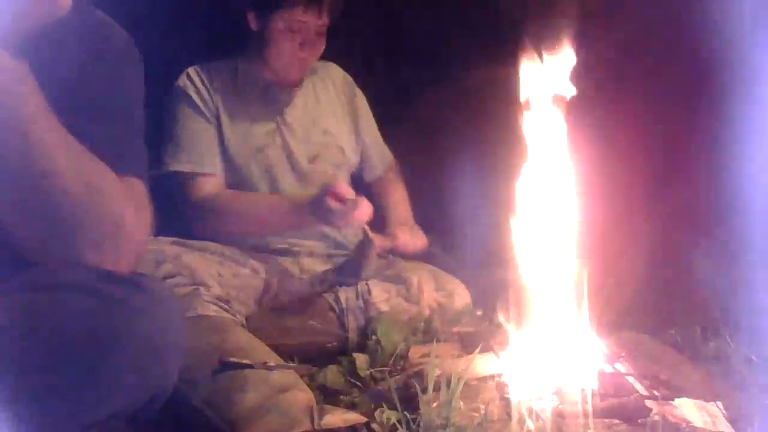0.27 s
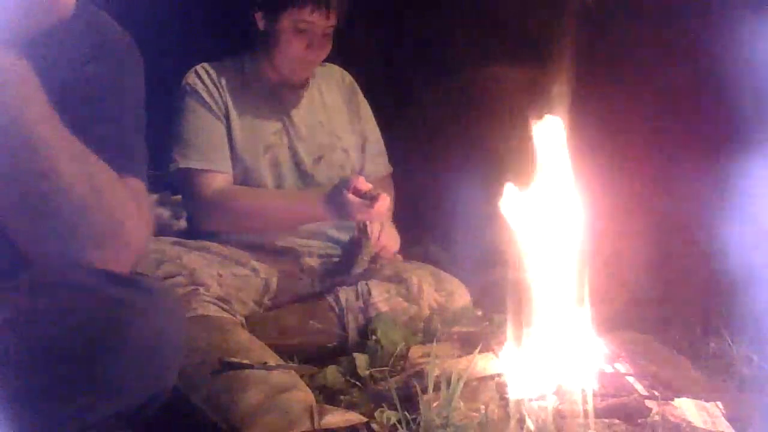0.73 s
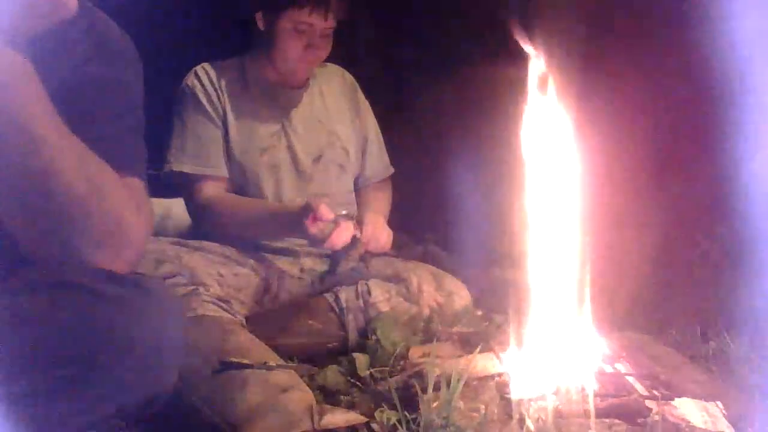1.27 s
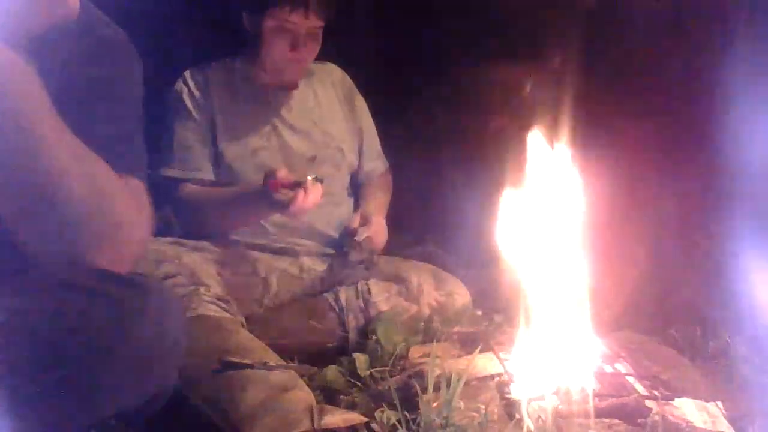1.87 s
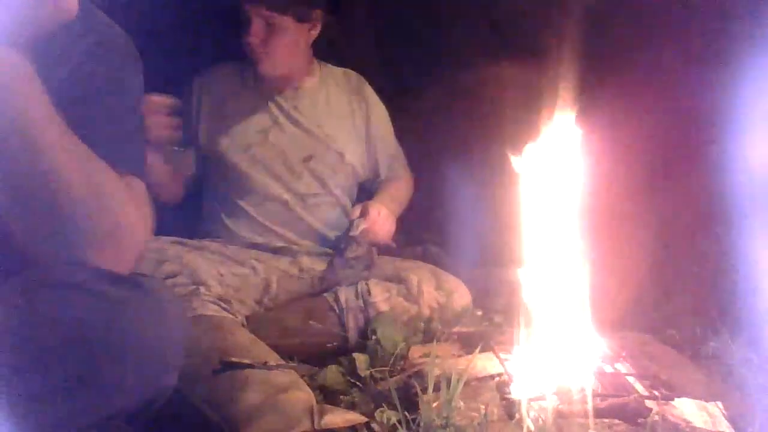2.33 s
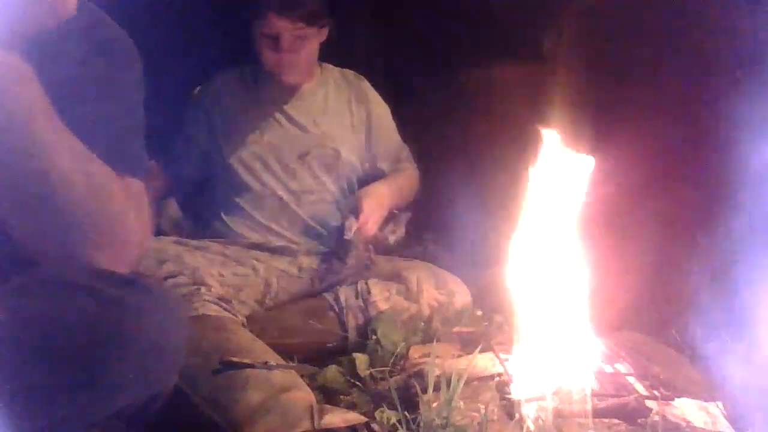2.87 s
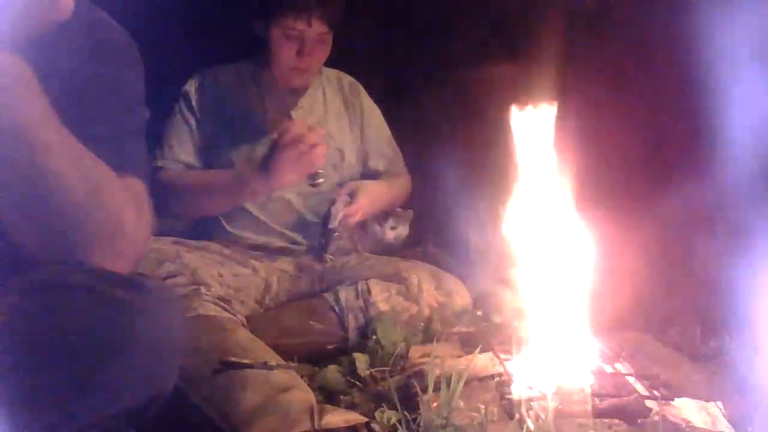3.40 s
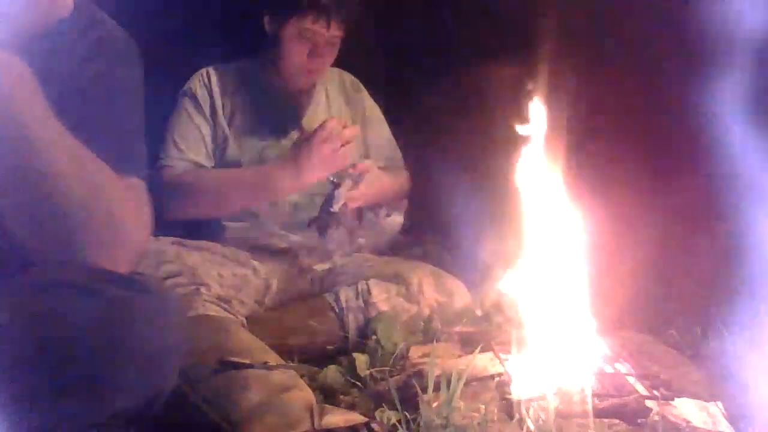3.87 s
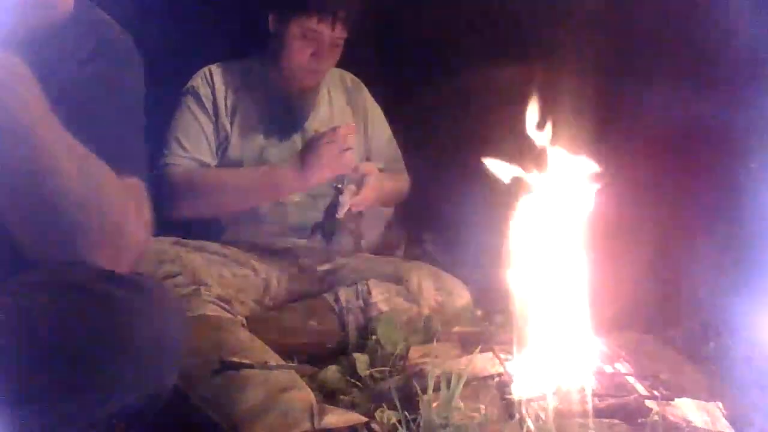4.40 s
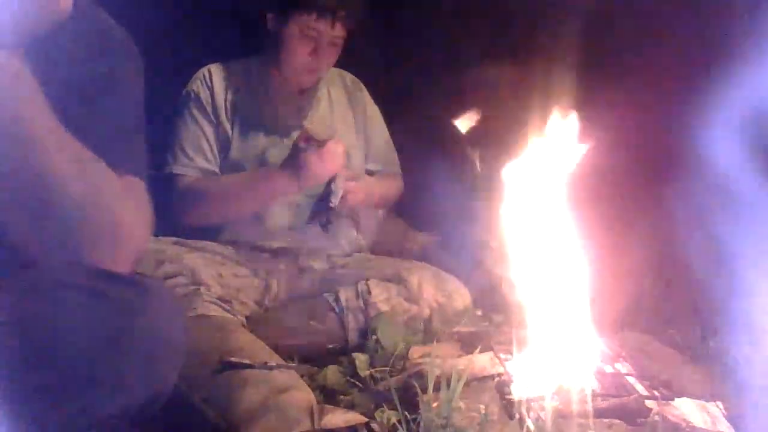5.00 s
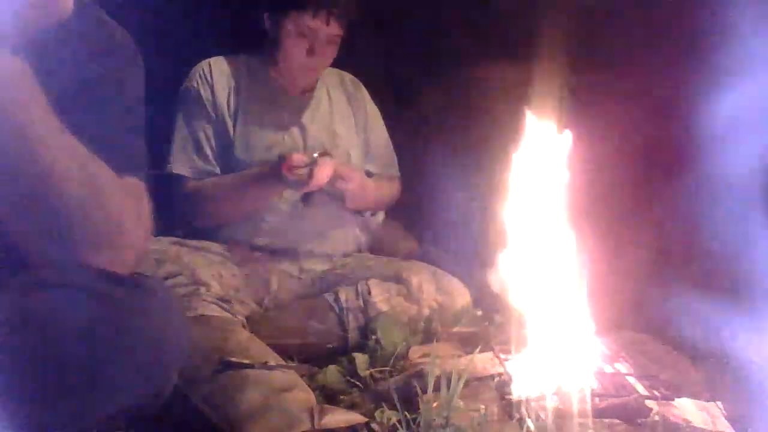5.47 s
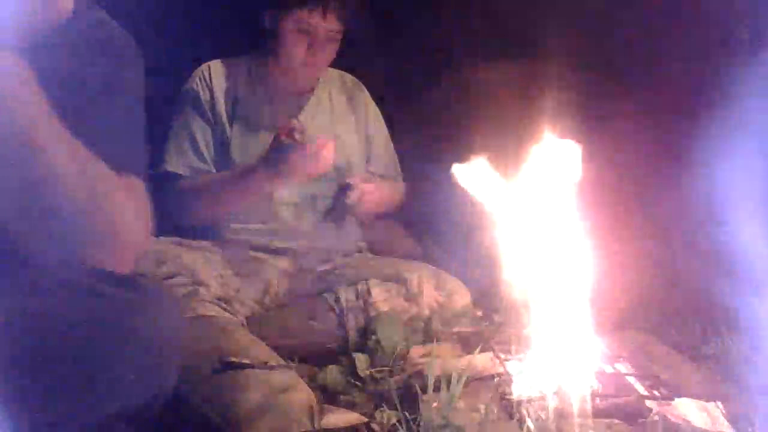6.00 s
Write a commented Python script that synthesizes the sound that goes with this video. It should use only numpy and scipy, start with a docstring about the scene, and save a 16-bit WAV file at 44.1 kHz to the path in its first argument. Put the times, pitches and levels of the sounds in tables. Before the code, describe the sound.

Someone whittles near the microphone beside a campfire in the woods, making two short bursts of crisp snaps, scrapes and dull knocks. Between the bursts an owl hoots twice, clear and echoing, and it calls once more at the end. Each hoot slides up, holds and sags. The fire pops loudly at the start, then keeps up a low rumble and faint ticking under steady distant crickets and a soft hiss.

```python
"""An owl hoots three times near a campfire at night, and the woods ring on after each call.
Each hoot is a nearly pure tone that slides up hoarsely, holds and sags away.
Someone whittles a stick by the fire: the knife snaps off chips and scrapes along the wood.
The flames rumble, tick and pop once, over steady crickets and the microphone's hiss."""
import sys
import numpy as np
from scipy import signal
from scipy.fft import rfft, irfft
from scipy.io import wavfile

SR = 44100
rng = np.random.default_rng(int(sys.argv[2]) if len(sys.argv) > 2 else 0)


def dump_mix(stems):
    """Bounce the given channels to the path in sys.argv[1] as a 16-bit WAV at rate SR."""
    frames = np.atleast_2d(stems).T  # one column per channel
    limited = np.clip(frames, -1, 1)  # hard clip at full scale
    pcm = np.round(limited * 32767).astype(np.int16)
    wavfile.write(sys.argv[1], SR, pcm)


N = 275139
TIME = np.arange(N) / SR
FREQS_HZ = np.fft.rfftfreq(N, 1 / SR)
HIT_MS = np.arange(SR // 8) * 1000 / SR  # the clock for one short hit


def amp(db):
    """Turns decibels into a gain."""
    return 10 ** (np.asarray(db) / 20)

def unit(x):
    """Scales a signal to an average (rms) size of 1."""
    return x / np.sqrt(np.mean(x ** 2) + 1e-20)

def read(points, hz):
    """Reads between a table's rows, with frequency spaced in octaves."""
    freqs, values = np.transpose(points)
    return np.interp(np.log(hz + 1), np.log(freqs + 1), values)

def add(mix, start_s, sound):
    """Mixes a sound in at its start time."""
    part = mix[round(start_s * SR):][:len(sound)]
    part += sound[:len(part)]

def noise(colour, tilt_db=0, pivot_hz=1500):
    """Noise shaped by a colour table, gaining tilt_db for each octave above the pivot."""
    octaves = np.log2(np.maximum(FREQS_HZ / pivot_hz, 1))
    gains = amp(read(colour, FREQS_HZ) + tilt_db * octaves)
    return unit(irfft(rfft(rng.standard_normal(N)) * gains, N))

def wander(rate_hz):
    """A random drift, mostly slower than rate_hz."""
    return unit(irfft(rfft(rng.standard_normal(N)) / (1 + (FREQS_HZ / rate_hz) ** 4), N))

def ease(x):
    """A smooth step from 0 to 1."""
    return np.sin(np.pi / 2 * np.clip(x, 0, 1)) ** 2


# Flame rumble and microphone hiss: freq_hz, level_db
AIR_COLOUR = [(10, -8), (30, 3), (60, -0.5), (120, -6.5), (220, -13.5), (450, -18), (900, -24),
              (2000, -25.5), (3300, -28), (7000, -34.5), (11000, -23.5), (15500, -25)]

def flames_and_hiss(level_db=-41, flicker_db=3.5):
    """The low rumble of the flames flickers while the hiss stays even."""
    air = amp(level_db) * noise(AIR_COLOUR)
    rumble = signal.sosfilt(signal.butter(1, 250, fs=SR, output="sos"), air)
    return air + rumble * (amp(flicker_db * wander(21)) - 1)

# The high, narrow band the crickets sing in: freq_hz, level_db
CRICKET_COLOUR = [(3300, -29), (3850, -8.5), (4150, 0.5), (4400, 0.5), (4750, -11), (5400, -40.5)]

def crickets(level_db=-51, throb_db=1.04):
    """Far crickets blend into one gently throbbing chorus."""
    return amp(level_db + throb_db * wander(25)) * noise(CRICKET_COLOUR)

# How the woods ring: freq_hz, ring_s (time to fade by 60 dB), level_db
WOODS_RING = [(199, 1.4, -10), (424, 1.76, 2), (580, 2.8, 11.5), (820, 0.94, 24), (1090, 2.65, 26.5),
              (2120, 0.6, 5), (4000, .6, -12), (10000, 0.26, -1)]

def woods_echo(sound, near_db=-19, near_s=0.11, far_db=-23):
    """Near trunks scatter a quick echo; the woods beyond ring on, most in the middle range."""
    t = TIME[:int(1.5 * SR)]
    wash = rng.standard_normal(len(t)) * np.minimum(t / 0.04, 1)
    hz, frame_s, bands = signal.stft(wash, SR, nperseg=256)
    ring_s, colour_db = (read(np.array(WOODS_RING)[:, [0, k]], hz)[:, None] for k in (1, 2))
    far = signal.istft(bands * amp(colour_db - 60 * frame_s / ring_s), SR, nperseg=256)[1][:len(t)]
    bounces = rng.standard_normal(len(t)) * (rng.random(len(t)) < .01)
    near = bounces * (t > .012) * np.exp(-t / near_s)
    echo = amp(near_db) * near / np.linalg.norm(near) + amp(far_db) * far / np.linalg.norm(far)
    return signal.fftconvolve(sound, echo)[:N]

# Cracking wood: freq_hz, level_db
CRACK_COLOUR = [(100, -11.5), (500, -17.5), (1500, -4.5), (3000, -12.5), (4200, -3), (6000, 0.5),
                (7600, 3.5), (10000, 0.5), (13000, -2), (16000, -3), (17500, -40)]

def crack_noise(tilt_db=0):
    """The bright noise shared by the fire's crackle and the snapping chips."""
    return noise(CRACK_COLOUR, tilt_db)

def embers(ticks_per_s=12, level_db=-46, decay_s=.0012):
    """Burning wood gives tiny ticks at random moments."""
    ticks = (rng.random(N) < ticks_per_s / SR) * amp(12 * rng.random(N) ** 2)
    envelope = signal.lfilter([1], [1, -np.exp(-1 / (decay_s * SR))], ticks)
    return amp(level_db) * envelope * crack_noise()

# The pop in the fire: freq_hz, level_db
RESIN_COLOUR = [(60, 1), (400, 11), (2000, 10), (4000, 6), (5200, -6), (8000, 4.5), (11000, 8.5),
                (15500, 17), (17000, -17)]

def resin_pop(start_s=.1073, level_db=2.5, fizz_db=-20, fizz_s=0.0034):
    """A pocket of resin bursts: one steep pressure pulse, then a fizz of escaping gas."""
    log_gain = np.log(amp(read(RESIN_COLOUR, abs(np.fft.fftfreq(2048, 1 / SR)))))
    # pack the energy at the very start of the pulse
    pulse = np.fft.ifft(np.exp(np.conj(signal.hilbert(log_gain)))).real
    fizz = crack_noise(tilt_db=6.6)[:len(pulse)] * np.exp(-TIME[:len(pulse)] / fizz_s)
    out = np.zeros(N)
    add(out, start_s, amp(level_db) * (pulse + amp(fizz_db) * fizz))
    return out

# Light taps on the knife: start_s, level_db, decay_ms
KNIFE_TAPS = [(3.463, -37, 30), (3.932, -35, 4), (5.1336, -25.5, 2.3), (5.147, -39, 2.6)]
# The notes the knife rings at: pitch_hz, width_hz, level_db
KNIFE_NOTES = [(2500, 240, -15), (3300, 22, -6), (3520, 710, 2), (5090, 210, 0.5), (6700, 490, -9),
               (7860, 790, -10)]

def knife_rattle(lowest_hz=2800):
    """A tap sets the knife chattering; it is too small to give off low notes."""
    body = sum(amp(db) / (1 + 2j * (FREQS_HZ - hz) / width_hz) for hz, width_hz, db in KNIFE_NOTES)
    body *= np.minimum(FREQS_HZ / lowest_hz, 1) ** 4
    envelope = np.zeros(N)
    for start_s, level_db, decay_ms in KNIFE_TAPS:
        add(envelope, start_s, amp(level_db) * np.exp(-TIME * 1000 / decay_ms))
    return envelope * unit(irfft(rfft(rng.standard_normal(N)) * body, N))

# Knocks of wood and bumps on the ground: start_s, level_db, pitch_hz, decay_ms
DULL_KNOCKS = [(1.03, -19.5, 70, 9.1), (1.456, -24, 500, 16.4), (1.505, -12.5, 518, 4.2),
               (1.534, -25, 446, 5.1), (1.592, -25.5, 350, 3.8), (5.181, -27, 655, 3),
               (5.471, -22, 718, 4.2), (5.472, -22.5, 234, 4.4), (5.736, -25.5, 884, 1.85)]

def knocks(upper_db=-13, attack_ms=0.9):
    """Each knock rings with two notes that die away quickly."""
    out = np.zeros(N)
    for start_s, level_db, pitch_hz, decay_ms in DULL_KNOCKS:
        phase = 2 * np.pi * pitch_hz * HIT_MS / 1000
        ring = np.sin(phase) + amp(upper_db) * np.sin(1.7 * phase)
        envelope = (1 - np.exp(-HIT_MS / attack_ms)) * np.exp(-HIT_MS / decay_ms)
        add(out, start_s, amp(level_db) * ring * envelope)
    return out

# Blade and hands rubbing the stick: start_s, length_s, level_db, tilt_db_per_octave
SCRAPES = [(0.48, 0.055, -48.5, -11.5), (1.112, 0.022, -46.5, -9.5), (1.481, 0.063, -20, 2),
           (1.52, 0.081, -37, -2.5), (3.465, 0.137, -51, -3.5), (4.989, 0.022, -44, -6),
           (5.43, 0.1, -37.5, -1.5), (5.502, 0.1, -35.5, -2)]
# The blade on wood: freq_hz, level_db
BLADE_COLOUR = [(30, -40), (200, -7), (900, -11.5), (3000, -5.5), (5500, 0), (10000, -2.5), (16000, 1)]

def scrapes(grain_hz=300, grain_db=3, slip_db=1.0):
    """The blade catches and slips on the grain."""
    out = np.zeros(N)
    catches = unit(amp(grain_db * wander(grain_hz) + slip_db * wander(grain_hz / 10)))
    for start_s, length_s, level_db, tilt_db in SCRAPES:
        pressure = np.interp((TIME - start_s) / length_s, [0, .1, .8, 1], [0.035, 0.78, 0.9, 0.038])
        out += amp(level_db) * pressure * catches * noise(BLADE_COLOUR, tilt_db)
    return out

# Chips snapping off: start_s, level_db, decay_ms, tilt_db_per_octave
CHIP_SNAPS = [(1.4559, -4, 1.73, -0.5), (1.4729, -10, 5.6, 0), (1.507, -14.5, 2.4, -1.5),
              (5.296, -19, 0.83, 3.5), (5.376, -29, 2.4, 8), (5.4536, -11, 1.05, 0.7)]

def snaps(tail_db=-19, tail_stretch=9):
    """Wood fibres break in a short burst; the stick buzzes on briefly."""
    out = np.zeros(N)
    for start_s, level_db, decay_ms, tilt_db in CHIP_SNAPS:
        tail_ms = tail_stretch * np.sqrt(decay_ms)
        burst = np.exp(-HIT_MS / decay_ms) + amp(tail_db) * np.exp(-HIT_MS / tail_ms)
        add(out, start_s, amp(level_db) * burst * crack_noise(tilt_db)[:len(HIT_MS)])
    return out


def breath(start_s, length_s, level_db, top_hz, hoarse_s):
    """A hoot climbs as air pressure builds, pushes, eases to a lower, purer note and closes."""
    low_hz, climb_s, attack_s, fade_s = 277.4, .033, 0.02, 0.027
    push_s, sag_s, sag_hz = .15, 0.0956, 45.74
    close_share, close_hz, close_db = 0.181, 81, -12
    swell_db, swell_s, rasp_rise_s = 4.5, 0.016, 0.087
    t = np.maximum(TIME - start_s, 0)
    # each stage is a weight from 0 to 1
    cleared = ease(4 * (t / hoarse_s - 1) + 1)
    swell = np.exp(-((t - hoarse_s) / swell_s - .5) ** 2)
    eased = ease((t - push_s) / sag_s)
    closing = np.clip(1 + (t - length_s) / (close_share * length_s), 0, 1) ** 2

    pitch_hz = top_hz - (top_hz - low_hz) * np.exp(-t / climb_s) - sag_hz * eased - close_hz * closing
    gain = amp(level_db) * np.exp(-np.maximum(t - length_s, 0) / fade_s)
    tone_gain = gain * (1 - np.exp(-t / attack_s)) ** 2 * amp(swell_db * swell + close_db * closing)
    rasp_db = (-18 * (1 - eased) - 27.5 * eased) * (1 - closing) - 22 * closing
    rasp_gain = gain * ease(t / rasp_rise_s) * amp(rasp_db)
    roughness = .62 * (1 - cleared) + cleared * (0.13 * (1 - eased) + 0.0099 * eased) + 0.32 * closing
    return pitch_hz, tone_gain, rasp_gain, np.clip(roughness, 0, 1)

# Faint higher notes in the rasp: pitch_multiple, level_db
RASP_OVERTONES = [(1.5, -3), (2, -12), (2.5, -15), (3, -17.5)]
# The owl's throat: freq_hz, level_db
THROAT_COLOUR = [(120, -19.5), (260, 3.5), (450, 4), (590, 0.5), (760, 6), (950, -6), (1150, -9),
                 (1400, -10.5), (1700, -20), (2300, -17.5), (2700, -32.5), (5000, -33)]

def throat_rasp(phase, noise_db=-2):
    """Air passes through the throat in one puff per cycle of the tone."""
    # strong and weak cycles take turns unsteadily, adding notes halfway between the overtones
    overtones = sum(amp(db) * np.sin(multiple * phase + .7 * wander(25)) * (1 + .5 * wander(21))
                    for multiple, db in RASP_OVERTONES)
    puffs = rng.standard_normal(N) * (1 + np.cos(phase))
    rasp = unit(irfft(rfft(puffs) * amp(read(THROAT_COLOUR, FREQS_HZ)), N))
    return overtones + amp(noise_db) * rasp

# The noise of the tone breaking up: freq_hz, level_db
GRUFF_COLOUR = [(150, -27.5), (290, 3.5), (560, 1), (780, -11.5), (1000, -27.5), (3000, -55.5)]

def voice(phase, roughness, flutter=0.94, choke_db=-5, gruff_db=-12, whistle_hz=5780, whistle_db=-49):
    """The owl's voice box makes a pure tone that shakes and breaks into noise when rough."""
    tone = np.sin(phase) * (1 + flutter * roughness * wander(65)) * amp(choke_db * roughness)
    gruff = amp(gruff_db) * roughness * noise(GRUFF_COLOUR)
    # a thin, high whistle rides on the tone while it is pure
    whistle = np.sin(2 * np.pi * whistle_hz * TIME + 1.3 * wander(52.6))
    return tone + gruff + amp(whistle_db) * (1 - roughness) ** 6 * whistle

# The owl's calls: start_s, length_s, level_db, top_hz, hoarse_s (length of the hoarse start)
OWL_HOOTS = [(2.706, .430, -10, 473, 0.094), (3.692, 0.17, -9.5, 482, 0.048),
             (5.979, 0.22, -9.5, 476.8, 0.0524)]

def owl(jitter=.09, shake_hz=65):
    """Each breath drives the voice and its rasp; roughness makes the pitch tremble."""
    out = np.zeros(N)
    for hoot in OWL_HOOTS:
        pitch_hz, tone_gain, rasp_gain, roughness = breath(*hoot)
        shaky_hz = pitch_hz * (1 + jitter * roughness * wander(shake_hz))
        phase = 2 * np.pi * np.cumsum(shaky_hz) / SR
        out += np.sqrt(2) * tone_gain * voice(phase, roughness) + rasp_gain * throat_rasp(phase)
    return out


def scene():
    """Owl, whittling, fire and crickets, the same in both channels."""
    hoots = owl()
    whittling = snaps() + scrapes() + knocks() + knife_rattle()
    echo = woods_echo(hoots + amp(-11) * whittling)
    fire = resin_pop() + embers() + flames_and_hiss()
    mono = hoots + whittling + echo + fire + crickets()
    return np.array([mono, mono])

def record(dry, cutoff_hz=15900):
    """The sharpest cracks overload and clip; then the highest treble is cut."""
    lowpass = signal.firwin(511, cutoff_hz, window=("kaiser", 8), fs=SR)
    return signal.oaconvolve(np.clip(dry, -1, 1), lowpass[None], "same")


dry = scene()
out = record(dry)
dump_mix(out)
```